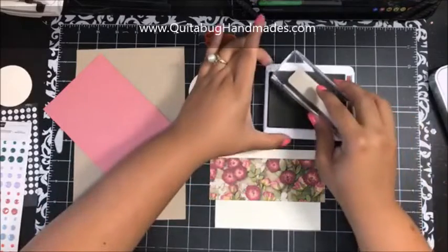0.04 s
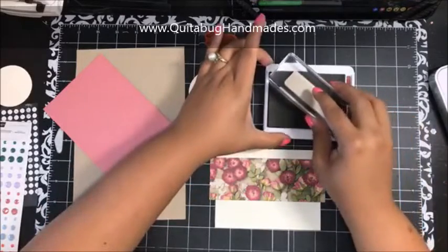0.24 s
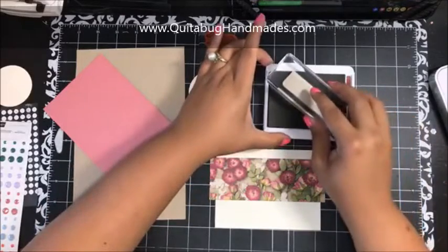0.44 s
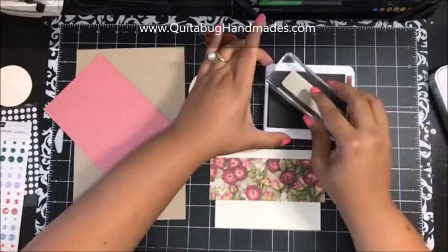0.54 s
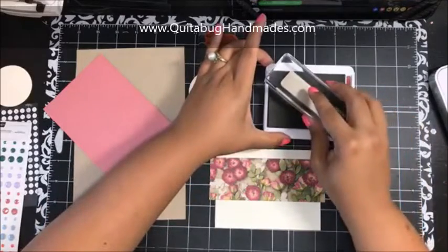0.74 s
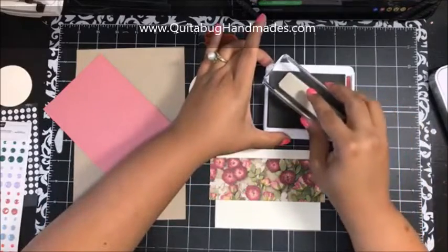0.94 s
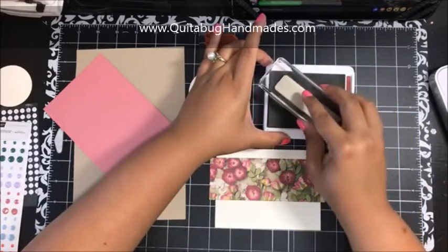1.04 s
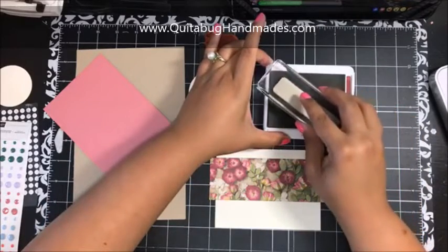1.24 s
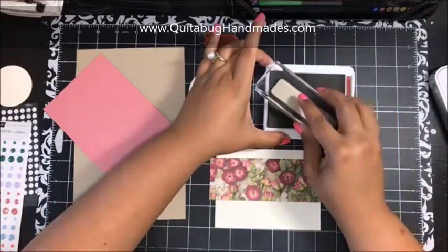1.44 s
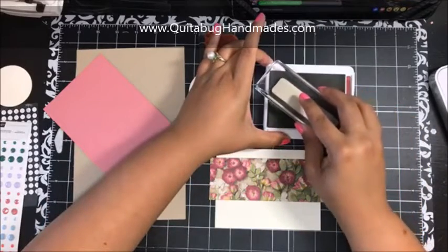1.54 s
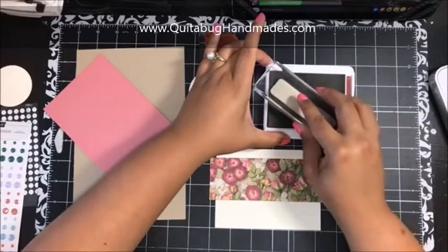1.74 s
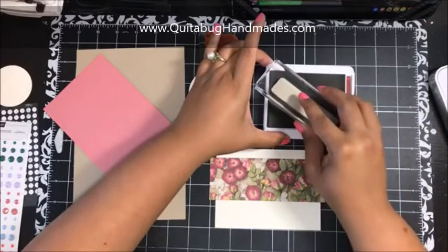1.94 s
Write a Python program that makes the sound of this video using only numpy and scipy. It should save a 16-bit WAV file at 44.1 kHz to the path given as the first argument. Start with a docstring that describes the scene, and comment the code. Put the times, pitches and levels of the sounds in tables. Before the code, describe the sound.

In a small, quiet room, one dry plastic clack opens a quick, even run of about a dozen soft taps as a rubber stamp pats an ink pad. Each tap thumps the table and knocks the pad's plastic case, with faint sticky crackles and ticks between taps as the stamp lifts. The last knock is the firmest. A low hum and soft hiss lie beneath, and the tapping sounds close.

```python
"""Soft thumps and plastic knocks, about seven a second, in a quiet room: a rubber stamp on an
acrylic block is tapped onto an ink pad on a craft table. Each tap rings the table top and the pad's
plastic case; the first blow clacks on its rim. The tacky ink squishes on landing, and crackles and
ticks on lift-off; the wet rubber squeaks faintly on one tap. Mains hum and soft hiss lie underneath."""
import sys
import numpy as np
from scipy import signal
from scipy.fft import rfft, irfft
from scipy.io import wavfile

SR = 44100
rng = np.random.default_rng(int(sys.argv[2]) if len(sys.argv) > 2 else 0)


def log_audio(samples):
    """Write samples as a 16-bit WAV file to the path given in sys.argv[1]."""
    # one column per channel
    frames = np.atleast_2d(samples).T
    # limit to full scale, then quantise
    limited = np.clip(frames, -1, 1)
    pcm = np.round(limited * 32767).astype(np.int16)
    wavfile.write(sys.argv[1], SR, pcm)


N = 88332
TIME = np.arange(N) / SR

# stamp landings: t/s, weight/dB, case knock/dB, knock centre f/Hz, ink squish/dB
TAPS = [(0.3062, 2, -3, 1070, -64.5), (0.4766, -1, -1, 666, -71), (0.6306, -1.5, -1.5, 595, -58.5),
        (0.7842, -2, -1.5, 720, -70), (0.927, -0.5, 1.5, 915, -64), (1.0765, -0.5, -6, 667, -63),
        (1.236, -1, 4.5, 934, -66.5), (1.3684, -0.35, -6.5, 800, -64.5), (1.5133, 1, -1.5, 644, -56.5),
        (1.6601, -1.5, -16.5, 700, -66.5), (1.8072, -2, -5, 720, -63), (1.9515, 0, 8, 920, -54)]
# stamp lift-offs: t/s, suction pop/dB, crackle/dB
LIFTS = [(0.006, -8, -64.5), (0.219, -12, -69.5), (0.398, -12.5, -74.5), (0.411, -15, -66.5),
         (0.5606, -9, -65), (0.728, -9.5, -65), (0.869, -21, -67), (1.013, -8, -62), (1.177, -13.5, -66.5),
         (1.309, -24, -66.5), (1.446, -11, -62), (1.604, -15, -67), (1.754, -13, -64.5), (1.888, -7, -65.5)]
# pad case modes: f/Hz, level/dB, t60/s
CASE_MODES = [(368, -73, 0.42), (391, -49.5, 0.14), (537, -50.5, 0.03), (611.5, -46, 0.037),
              (699, -48, 0.032), (828, -54, 0.025), (916, -46, 0.027), (1228, -52, 0.044),
              (1306, -56.5, 0.045)]
# acrylic block modes: f/Hz, level/dB, t60/s
BLOCK_MODES = [(1340, -41, 0.0098), (1660, -44.5, 0.0061), (3020, -41.5, 0.016), (3800, -53.5, 0.0078),
               (5230, -54, 0.0077), (6500, -53.5, 0.0053)]


def table_thumps(felt_hz=239.4, rim_hz=503, rebound_hz=178, rebound_db=-10):
    """Felt-cushioned blows ring the table's low modes; a firmer contact reaches higher."""
    # table top modes: f/Hz, level/dB, t60/s, polarity
    modes = [(52.2, -32, 0.07, 1), (65.8, -34.5, 0.21, -1), (104.65, -32, 0.12, -1), (139.4, -44, 0.12, 1),
             (157.6, -35.5, 0.24, 1), (190.4, -36.5, 0.093, 1), (237.2, -49, 0.21, 1),
             (310, -35, 0.031, -1)]
    force = blow([0.0718], db=-2.5, cutoff_hz=rim_hz)   # first blow hits the rim, uncushioned
    for t_s, weight_db, knock_db, _, _ in TAPS:
        stiffening_oct = 0.1257 * weight_db + 0.09 * knock_db   # felt stiffens under load
        force += blow([t_s], weight_db, felt_hz * 2 ** stiffening_oct)
    lift_s, pop_db, _ = np.transpose(LIFTS)
    force += blow(lift_s, pop_db + rebound_db, rebound_hz)   # released pad drops back
    return sum(polarity * from_db(db) * ring(force, hz, t60_s) for hz, db, t60_s, polarity in modes)


def case_knocks(lead_s=0.00085, contact_hz=1300, pop_hz=760, radiate_hz=380):
    """The case knocks just before the weight reaches the table, and pops as the suction lets go."""
    tap_s, _, knock_db, centre_hz, _ = np.transpose(TAPS)
    lift_s, pop_db, _ = np.transpose(LIFTS)
    knocks = strike(CASE_MODES, tap_s - lead_s, knock_db, centre_hz)
    pops = strike(CASE_MODES, lift_s, pop_db, pop_hz)
    radiated = highpass(knocks + pops, radiate_hz)   # too small to radiate bass
    return lowpass(lowpass(radiated, contact_hz), contact_hz)   # once for rubber, once for felt


def rim_clack(crack_db=-38, crack_t60_s=0.014):
    """Plastic on plastic: a dry crack, finger-damped block modes and the hollow case."""
    # block chattering on the rim: t/s, level/dB
    contacts = [(0.0722, -1.5), (0.0737, -6.5), (0.0767, -18)]
    # crack spectrum: f/Hz, relative density/dB
    spectrum = [(1200, 10), (1900, 5), (3500, -10.5), (7000, -17), (15000, -36)]
    t_s, db = np.transpose(contacts)
    pole = from_db(-60 / (crack_t60_s * SR))
    envelope = signal.lfilter([1], [1, -pole], clicks(t_s, from_db(db)))
    crack = from_db(crack_db) * envelope * colour(rng.standard_normal(N), spectrum)
    block = strike(BLOCK_MODES, t_s, db, focus_db=0)
    hollow = strike(CASE_MODES, t_s[:1], blow_db=0, centre_hz=320)
    return block + crack + hollow


def tacky_ink(threads_per_s=7000, squish_s=0.0034, peel_s=0.0048, doubling_db=12):
    """Ink squishes on landing; its threads snap on lift-off. A weaker pop is a slower peel."""
    # squish and crackle spectra: f/Hz, relative density/dB
    squish_spectrum = [(900, 4.5), (1700, -5), (2500, 0), (3600, -13.5), (5500, -20), (9000, -27),
                       (15000, -31)]
    crackle_spectrum = [(650, -9), (1000, 6), (1700, -1.5), (2700, 1.5), (3600, -3), (5000, -10),
                        (10000, -16.5), (15000, -24)]
    snaps = rng.standard_normal(N) * (rng.random(N) < threads_per_s / SR)
    squish = sum(from_db(db) * swell(t_s, squish_s) for t_s, *_, db in TAPS)
    peel = sum(from_db(db) * swell(t_s, peel_s * 2 ** (-pop_db / doubling_db))
               for t_s, pop_db, db in LIFTS)
    return squish * colour(snaps, squish_spectrum) + peel * colour(snaps, crackle_spectrum)


def release_ticks(flick_db=41):
    """The last ink thread lets go and flicks the block, ringing its upper modes."""
    lift_s, _, crackle_db = np.transpose(LIFTS)
    return strike(BLOCK_MODES, lift_s, crackle_db + flick_db, centre_hz=3000)


def rubber_squeaks(t60_s=0.0011):
    """Wet rubber slips on the pad: noise bursts through a high, steep-sided resonance."""
    # slips: t/s, level/dB, f/Hz, length/s
    slips = [(1.512, -62.5, 11100, 0.0045), (1.520, -62, 11400, 0.0034), (1.53, -75, 11600, 0.012)]
    squeaks = np.zeros(N)
    for t_s, db, hz, length_s in slips:
        band = ring(ring(rng.standard_normal(N), hz, t60_s), hz, t60_s)
        squeaks += from_db(db) * swell(t_s, length_s) * unit_rms(band)
    return squeaks


def room(x, t60_s=0.4, wall_hz=5000, first_echo_s=0.0012):
    """Diffuse reflections of a small furnished room; unit-energy tail."""
    envelope = from_db(-60 * TIME / t60_s) * (TIME > first_echo_s)
    tail = envelope * lowpass(rng.standard_normal(N), wall_hz)
    return signal.fftconvolve(x, tail / np.sqrt(np.sum(tail ** 2)))[:N]


def background(mains_hum_hz=120, hiss_db=-56.5):
    """Steady mains hum over room hiss."""
    # hum partials: harmonic number, peak level/dB
    partials = [(1, -41.0), (2, -82.5)]
    # hiss spectrum: f/Hz, relative density/dB
    spectrum = [(25, 11.5), (55, 20), (110, 17.5), (200, 8.5), (300, 2.5), (450, -3.5), (700, -5),
                (1200, -7), (2000, -12), (3400, -13.5), (5200, -20), (9000, -23.5), (13000, -27),
                (16000, -28.5)]
    hum = sum(from_db(db) * np.sin(2 * np.pi * k * mains_hum_hz * TIME) for k, db in partials)
    return hum + from_db(hiss_db) * colour(rng.standard_normal(N), spectrum)


def blow(times_s, db, cutoff_hz):
    """Force pulses; a harder contact is shorter and has a higher cutoff."""
    return lowpass(clicks(times_s, from_db(db)) + 1e-18, cutoff_hz)


def strike(modes, times_s, blow_db, centre_hz=1000, focus_db=26):
    """The spot struck favours modes near centre_hz; those an octave away get focus_db less."""
    scatter_db = rng.standard_normal((len(times_s), len(modes)))
    ringing = np.zeros(N)
    for k, (hz, db, t60_s) in enumerate(modes):
        share_db = scatter_db[:, k] - focus_db * np.log2(hz / centre_hz) ** 2
        force = clicks(times_s, from_db(db + blow_db + share_db))
        ringing += ring(force, hz, t60_s)
    return ringing


def ring(force, hz, t60_s):
    """One mode: a unit impulse starts a decaying sine of height 1."""
    radius = from_db(-60 / (t60_s * SR))
    step_rad = 2 * np.pi * hz / SR
    feedback = [1, -2 * radius * np.cos(step_rad), radius ** 2]
    return signal.lfilter([0, np.sin(step_rad)], feedback, force + 1e-18)


def clicks(times_s, heights):
    """One impulse at each time."""
    samples = np.round(np.asarray(times_s) * SR).astype(int)
    impulses = np.zeros(N)
    np.add.at(impulses, np.clip(samples, 0, N - 1), heights)
    return impulses


def swell(centre_s, length_s):
    """Gaussian envelope, peak 1."""
    return np.exp(-2 * ((TIME - centre_s) / length_s) ** 2)


def colour(x, spectrum):
    """Shape x to a spectrum, rolled off below its first point; rms 1."""
    hz, db = np.transpose(spectrum)
    bins_hz = np.maximum(np.arange(N // 2 + 1) * SR / N, 1)
    gain = from_db(np.interp(np.log(bins_hz), np.log(hz), db))
    gain /= np.sqrt(1 + (hz[0] / bins_hz) ** 4)
    return unit_rms(irfft(rfft(x) * gain, N))


def lowpass(x, hz):
    return signal.sosfilt(signal.butter(2, hz, fs=SR, output="sos"), x)


def highpass(x, hz):
    return signal.sosfilt(signal.butter(2, hz, "high", fs=SR, output="sos"), x)


def from_db(db):
    return 10 ** (np.asarray(db) / 20)


def unit_rms(x):
    return x / np.sqrt(np.mean(x ** 2) + 1e-20)


def scene(thump_send_db=-25, clack_send_db=-16, pad_send_db=-16):
    """Mono mix; the thumps arrive mostly through the table and send least into the room."""
    thumps = table_thumps()
    clack = rim_clack()
    pad = case_knocks() + tacky_ink() + release_ticks() + rubber_squeaks()
    send = from_db(thump_send_db) * thumps + from_db(clack_send_db) * clack + from_db(pad_send_db) * pad
    return (thumps + clack + pad + room(send) + background())[None]


def record(dry, bass_cut_hz=22, top_cut_hz=15600):
    """The microphone sheds the deepest bass; the top is cut steeply."""
    top_cut = signal.ellip(10, 0.1, 70, top_cut_hz, fs=SR, output="sos")
    return signal.sosfilt(top_cut, highpass(dry, bass_cut_hz))


dry = scene()
out = record(dry)
log_audio(out)
```